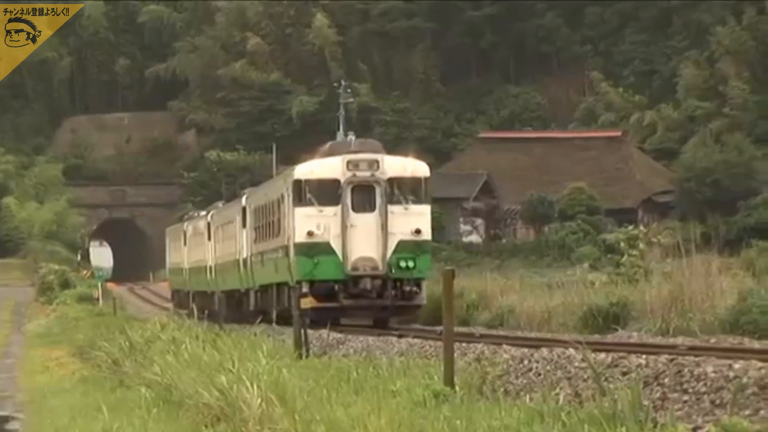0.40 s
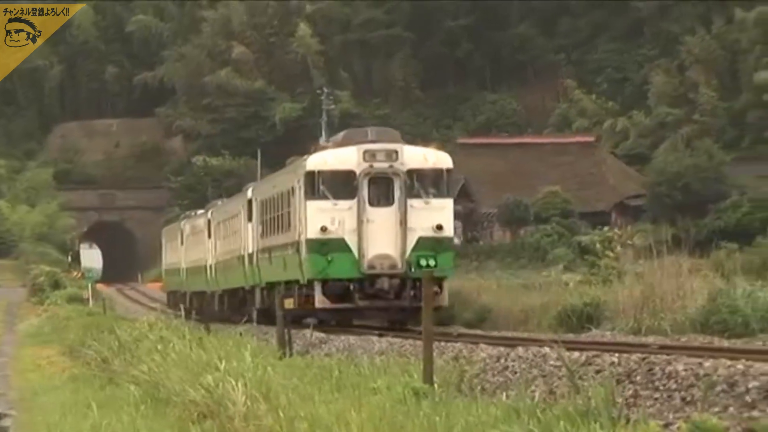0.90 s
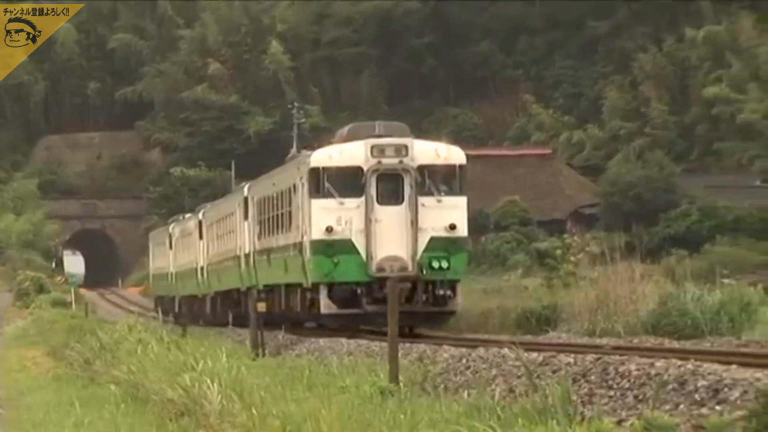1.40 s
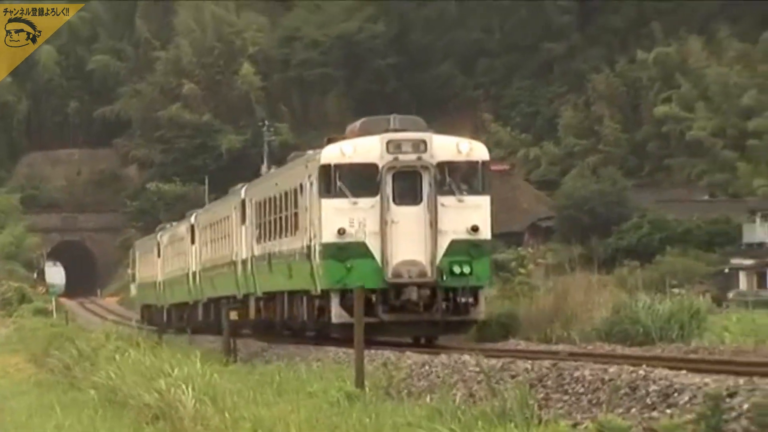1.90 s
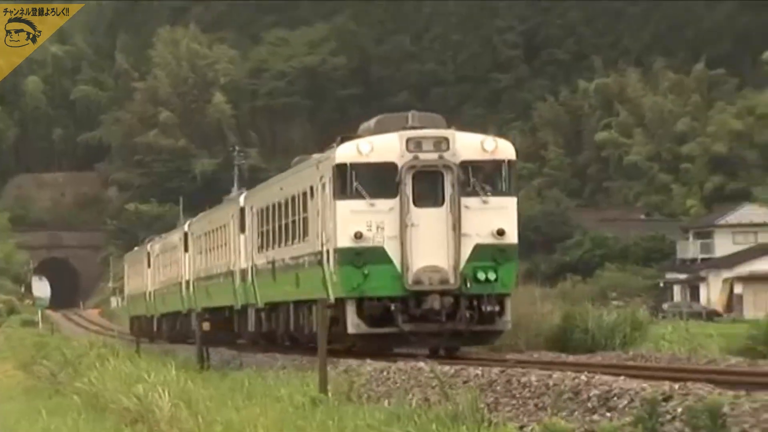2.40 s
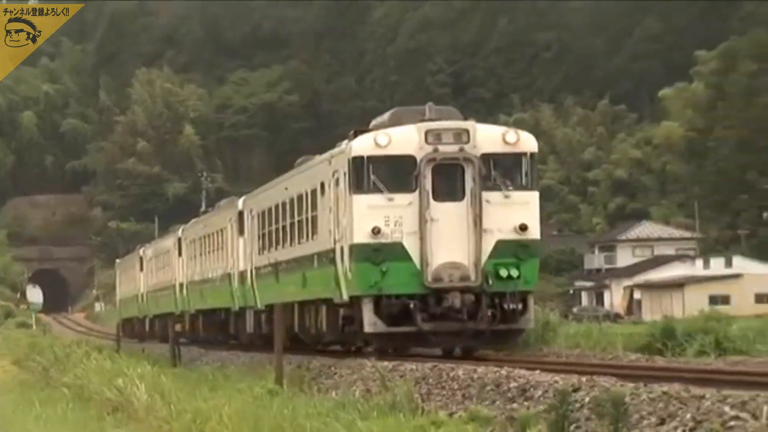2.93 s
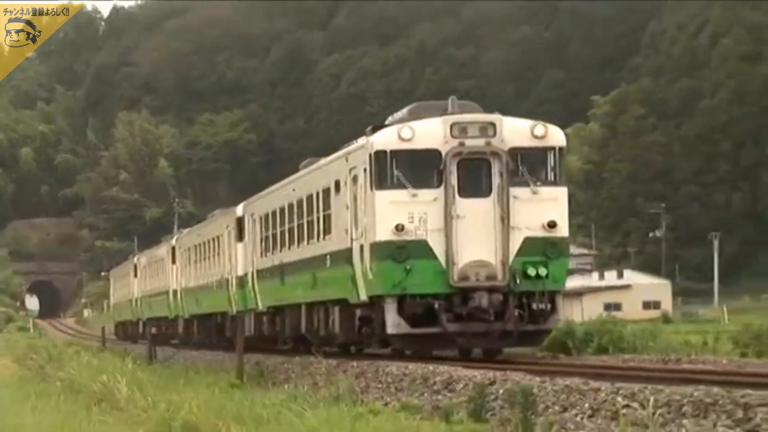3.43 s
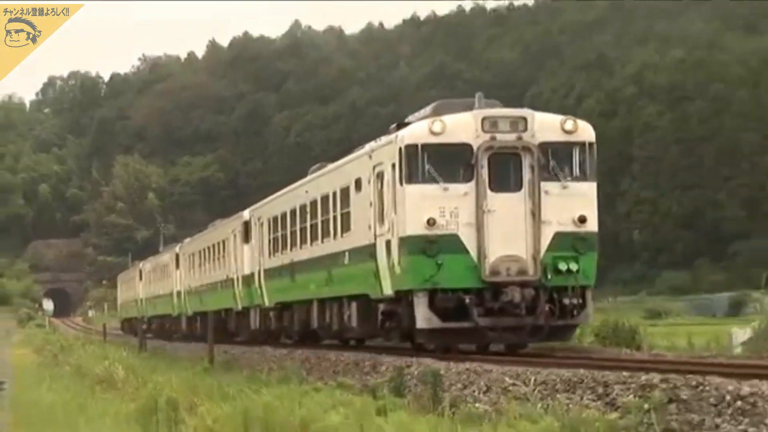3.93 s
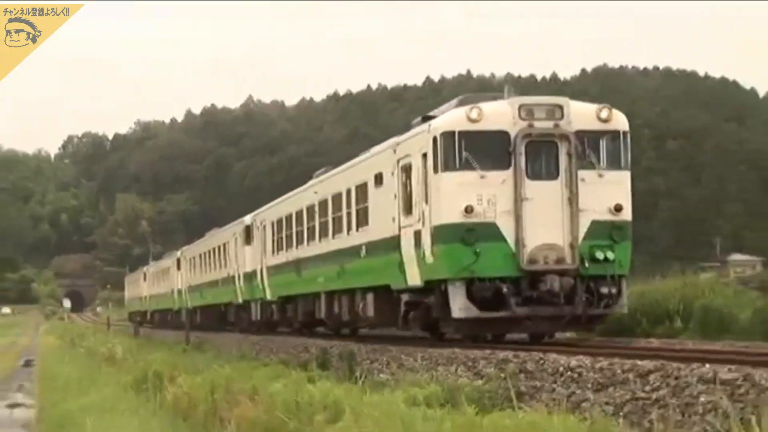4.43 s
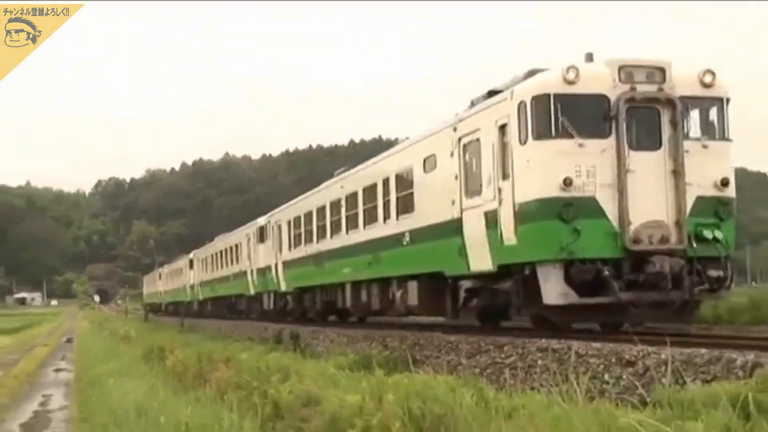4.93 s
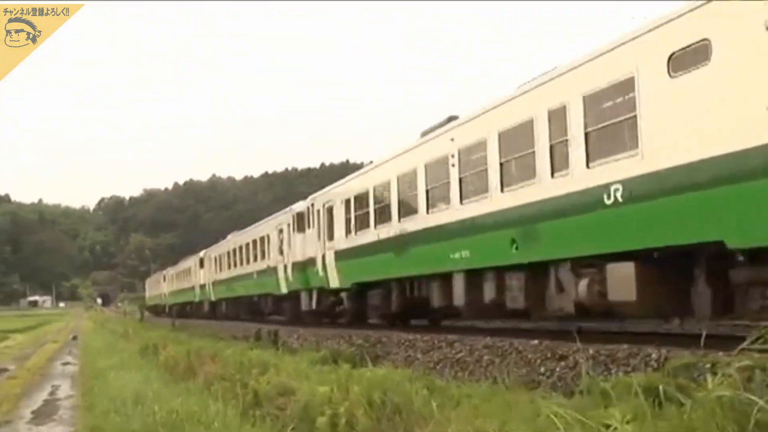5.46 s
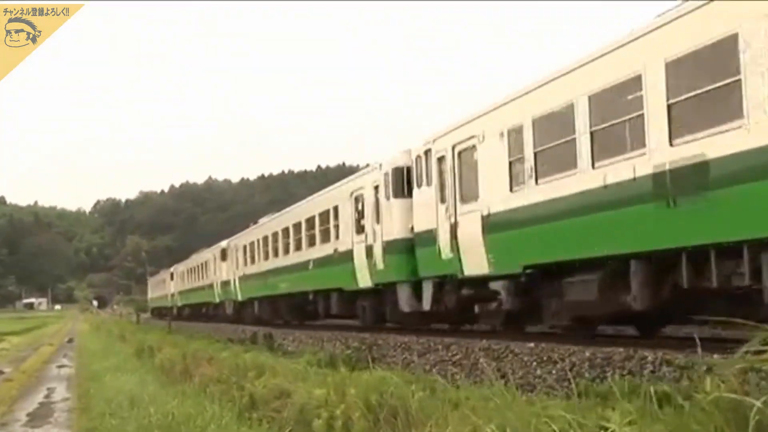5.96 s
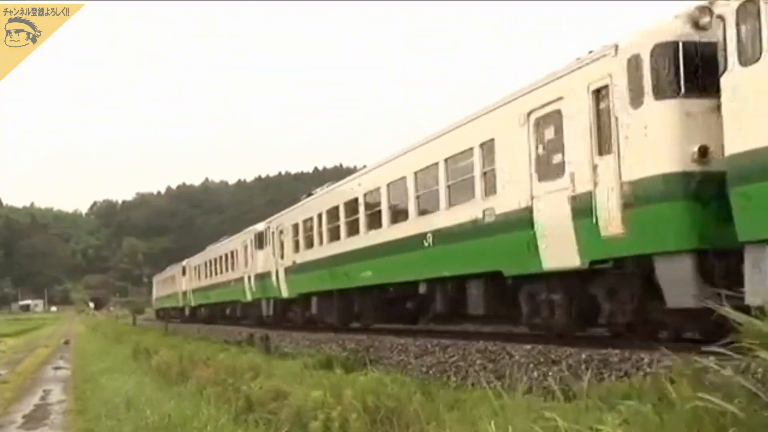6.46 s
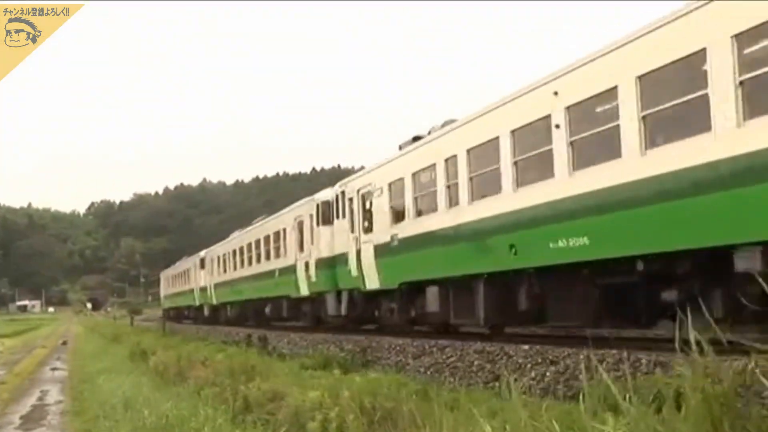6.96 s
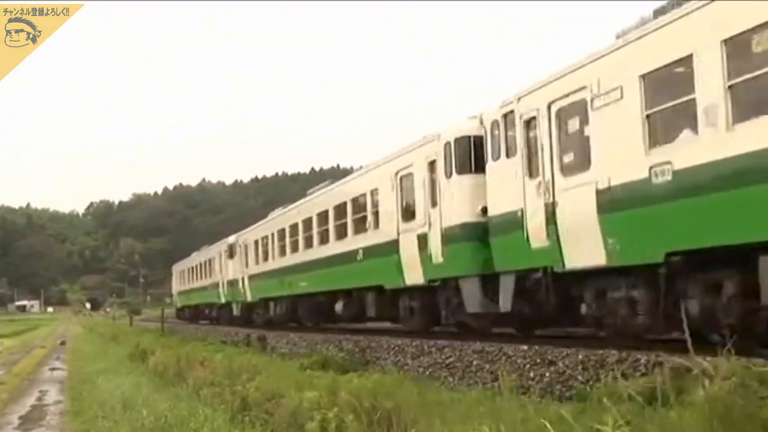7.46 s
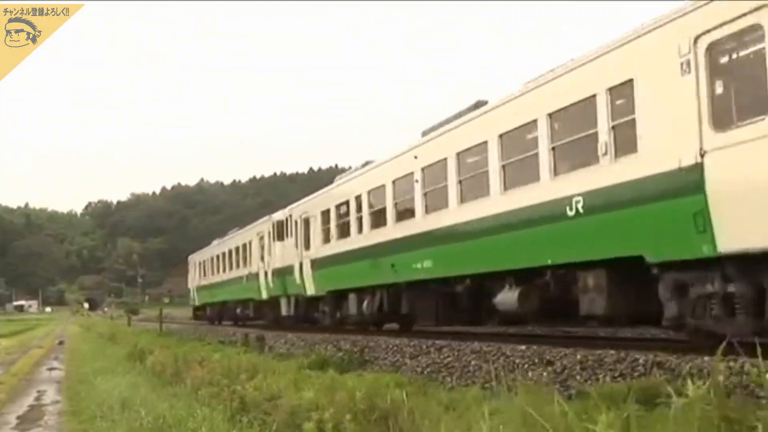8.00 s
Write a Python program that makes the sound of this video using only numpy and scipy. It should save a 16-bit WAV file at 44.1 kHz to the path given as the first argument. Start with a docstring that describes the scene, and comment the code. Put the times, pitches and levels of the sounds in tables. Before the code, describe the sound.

Distant rolling hiss and double joint thuds swell steadily until several diesel railcars rush by at close range in a broad, loud, humming roar.

```python
"""A diesel railcar train nears on the track ahead, then runs past on the right of a microphone pair.
Wheels and underfloor engines roar alongside as shaped noise; ahead come rumble, rolling hiss and fizz.
Axles thump and clack over joints: damped swings and noise bursts. The near rail sings in its resonances.
Two fuzzy hums waver below. Sound from ahead is much alike in both ports; from the side it is
late and mostly weak on the left."""
import sys
import numpy as np
from scipy import signal
from scipy.fft import rfft, irfft, next_fast_len
from scipy.io import wavfile
from scipy.ndimage import uniform_filter1d, map_coordinates

SR = 44100
rng = np.random.default_rng(int(sys.argv[2]) if len(sys.argv) > 2 else 0)


def store_wav(level_fs):
    """Save 16-bit WAV to argv[1]."""
    pcm = np.round(np.clip(np.atleast_2d(level_fs), -1, 1) * 32767)
    wavfile.write(sys.argv[1], SR, pcm.T.astype(np.int16))


def boost(x):
    """Linear amplitude factor 10**(x/20) for a level x in decibels (scalar or array-like)."""
    u = np.asarray(x, float) / 20
    return 10 ** u


N = 357651

# wheel roar of the cars alongside: [t/s, level/dB]
ALONGSIDE = [(3.4, -58.5), (4.5, -47.5), (5.5, -35.5), (5.75, -26), (6.1, -22.5), (6.45, -22.5),
             (6.85, -19), (7.3, -21.5), (7.7, -25), (8.11, -22.5)]
# underfloor engine spectrum: [f/Hz, level/dB per Hz]
ENGINE = [(71, -9.5), (120, -2.5), (231, -4), (291, -6), (335, -4), (430, 0.5), (700, -7.5), (910, -2.5),
          (1540, -120)]
# wheel roar spectrum: [f/Hz, level/dB per Hz]
WHEELS = [(350, -30), (600, -2), (1130, -1), (1540, -4), (2100, -2.5), (3300, -8.5), (4400, -11),
          (5000, -7), (5800, -4.5), (6200, -19.5), (6800, -57), (7100, -26), (10000, -120)]
# treble of the near cars: [f/Hz, level/dB per Hz]
NEAR_FIZZ = [(5710, -38), (9700, 0.5), (10200, 0.5), (11100, 3), (14400, 1), (15000, 0)]
# 7-10 kHz part of that treble: [f/Hz, level/dB per Hz]
SIZZLE = [(6800, -38), (7400, -3.5), (8500, 5), (9500, -14), (10000, -40)]
LEVEL_ROAR_DB = -23  # roar with the train level with the microphone
ENGINE_MOST_DB, ENGINE_FLUTTER_DB = -27, 1.3  # ceiling before wavering; flutter
WHEELS_RE_ROAR_DB, SIZZLE_RE_FIZZ_DB = 0.96, -1.5


def cars_alongside():
    """Engines and wheels roar as shaped noise, swelling steeply as the first car draws level."""
    roar_db, = curves(ALONGSIDE)
    over_db = roar_db - LEVEL_ROAR_DB
    shake = wobble(8)
    engine_db = np.minimum(follow(-23.5, 1.03, over_db), ENGINE_MOST_DB)
    engine_db = engine_db + 0.96 * shake + ENGINE_FLUTTER_DB * wobble(25)
    engines = boost(engine_db) * rush(coloured(ENGINE), patchy_db=1.5)
    wheel_db = roar_db + WHEELS_RE_ROAR_DB + 0.75 * shake + 0.067 * wobble(32)
    wheels = boost(wheel_db) * rush(coloured(WHEELS), patchy_db=0.84)
    sizzle = boost(SIZZLE_RE_FIZZ_DB) * rush(coloured(SIZZLE), patchy_db=1.5)
    treble = rush(coloured(NEAR_FIZZ), patchy_db=2.0) + sizzle
    fizz = boost(follow(-41.5, 0.6, over_db) + 0.37 * shake) * treble
    return engines + wheels + np.sqrt(nearness()) * fizz


# rolling level of the cars ahead: [t/s, level/dB]
AHEAD = [(0, -56), (.5, -52.5), (1.2, -46.5), (2, -44.5), (2.8, -42.5), (3.2, -41), (3.7, -39),
         (4.1, -34.5), (4.6, -32.5), (5.15, -28), (5.6, -23.5), (6.2, -23.5), (6.7, -24.5), (7.3, -31.5),
         (7.7, -26.5), (8.11, -26)]
# ground rumble spectrum: [f/Hz, level/dB per Hz]
RUMBLE = [(12, -40), (20, -37), (32, 3.5), (54, -1), (61, 0.5), (70, 0), (166, -13.5), (300, -32.5),
          (390, -75), (660, -120)]
# rolling hiss spectrum: [f/Hz, level/dB per Hz]
HISS = [(150, -15), (220, 1.5), (400, -13.5), (900, -3), (1300, -5), (2100, -3), (2600, 1), (3300, -5),
        (4200, -6.5), (5100, -6), (6100, -16), (6600, -86), (8000, -81), (10000, -120)]
# wheel resonances over the hiss: [f/Hz, width/Hz, level/dB]
WHEEL_RING = [(1782, 56, 2.5), (1980, 170, 4), (2563, 104, 6), (2960, 196, 3), (3280, 160, 2.5),
              (3500, 27, 6)]
# treble of the far cars: [f/Hz, level/dB per Hz]
FAR_FIZZ = [(3820, -7), (6500, 3), (7770, -6.5), (8660, 3.5), (10500, -8.5), (13100, -10), (14500, -16),
            (15000, -29)]
MIDDLING_ROLL_DB = -40  # rolling level at middling distance
RUMBLE_MOST_DB, RUMBLE_ALONGSIDE_DB = -36.5, 3  # ceiling; extra once alongside
HISS_RE_ROLL_DB, RING_RE_ROLL_DB = -2.2, -6


def train_ahead():
    """Ground rumble, rolling hiss, wheel resonances and fizz: noises driven by one rolling level."""
    roll_db, = curves(AHEAD)
    over_db = roll_db - MIDDLING_ROLL_DB
    shake = wobble(9)  # uneven track: shared by rumble, hiss and fizz
    rumble_db = np.minimum(follow(-39, 0.42, over_db), RUMBLE_MOST_DB)
    rumble_db = rumble_db + RUMBLE_ALONGSIDE_DB * nearness() ** 4 + 1.6 * shake + 1.5 * wobble(3)
    rumble = boost(rumble_db) * rush(coloured(RUMBLE), patchy_db=0.0)
    hiss_db = roll_db + HISS_RE_ROLL_DB + 0.097 * shake + 0.11 * wobble(23)
    hiss = boost(hiss_db) * rush(coloured(HISS), patchy_db=1.68)
    ring_db = roll_db + RING_RE_ROLL_DB + 0.7 * wobble(12) + 1.5 * wobble(2.5)
    ring = boost(ring_db) * rush(ringing(WHEEL_RING), patchy_db=1.8)
    fizz_db = follow(-61.5, 1.19, over_db) + 2.3 * shake + 0.56 * wobble(7.1)
    fizz = boost(fizz_db) * rush(coloured(FAR_FIZZ), patchy_db=2.0)
    return rumble + hiss + ring + np.sqrt(1 - nearness()) * fizz


# axles on joints: [t/s, swing peak level/dB, swing f/Hz, shudder level/dB, clack level/dB]
JOINTS = [(0.12, -35, 75.6, -39, -39.5), (0.233, -48, 90, -42, -45), (1.014, -30.5, 74, -30.5, -32.5),
          (1.127, -43, 97, -36, -35), (1.511, -26, 201, -24, -24.5), (1.626, -28.5, 157, -24.5, -29.5),
          (1.779, -33, 141, -31, -50), (1.88, -17.5, 167, -21, -31), (1.997, -27.5, 174, -24.5, -34),
          (2.281, -26.5, 101, -30.5, -38), (2.401, -34, 95, -31, -49), (2.661, -33, 93, -30, -43),
          (2.772, -25.5, 71, -29, -42), (2.984, -35, 58.4, -26, -41), (3.114, -23, 170, -18, -23.5),
          (3.231, -22.5, 125, -21, -25.5), (3.457, -28, 67.3, -30.5, -53), (3.839, -27.5, 68.4, -31, -44),
          (3.92, -24, 101, -27, -34), (4.032, -25.5, 85, -28, -49), (4.428, -25.5, 98, -28.5, -37),
          (5.233, -32, 76, -22.5, -27), (5.654, -30, 90, -21.5, -35), (5.769, -23, 81, -20, -33),
          (5.969, -30, 80, -19, -36), (6.509, -30, 70, -27, -35), (6.634, -24, 73, -28, -34),
          (7.684, -26, 80, -40, -37)]
# ground shudder spectrum: [f/Hz, level/dB per Hz]
THUMP = [(25, -26), (45, 16), (110, 4.5), (230, 1), (340, -17), (500, -49.5)]
# knock spectrum: [f/Hz, level/dB per Hz]
KNOCK = [(170, -30), (260, -3), (400, 2), (600, -9), (900, -0.5), (1300, -9), (1800, -45)]
# steel clack spectrum: [f/Hz, level/dB per Hz]
CLACK = [(1000, -10), (1500, -5), (2500, -0.5), (4000, -9.5), (5000, -13), (6500, -28), (9000, -46),
         (14000, -64)]
MIDDLING_BLOW_DB = -33  # mean of shudder and clack
KNOCK_DB_PER_OCTAVE = 4.5  # blows with a higher swing knock harder
CLACK_LEAD_S = 0.006


def joints():
    """An axle drops on a joint: steel clack first, then track bed swings, ground shudder and knock."""
    size = SR // 4
    out, t = np.zeros((2, N + SR)), np.arange(size) / SR
    for s, swing_db, hz, shudder_db, clack_db in JOINTS:
        at = round(s * SR)
        swing = np.sin(2 * np.pi * hz * t) * np.exp(-hz * t / 1.15) * (1 - np.exp(-t / 0.006))
        out[0, at:at + size] += boost(swing_db) * swing / swing.max()
        out[:, at:at + size] += boost(shudder_db) * burst(THUMP, 0.012, 0.25)
        blow_db = (shudder_db + clack_db) / 2
        knock_db = follow(-45.5, 0.91, blow_db - MIDDLING_BLOW_DB)
        knock_db += KNOCK_DB_PER_OCTAVE * np.log2(hz / 130)
        out[:, at:at + size] += boost(knock_db) * burst(KNOCK, 0.0015, 0.15)
        at -= round(CLACK_LEAD_S * SR)
        out[:, at:at + size] += boost(clack_db) * burst(CLACK, 0.0083, 0.14)
    return out[:, :N]


# bogies whose blows run along the near rail: [first axle t/s, ping level/dB]
PINGS = [(3.012, -27), (3.815, -36), (4.196, -45)]
# blow on the near rail: [f/Hz, level/dB per Hz]
PING = [(350, -34), (550, -12), (850, 4), (1080, -9), (1400, 1), (1600, -4), (1800, -24), (4000, -50)]
# bright tick of every axle: [f/Hz, level/dB per Hz]
TICK = [(6500, -40), (8200, 6), (9500, -8), (14000, -8), (15000, -30)]
# rail resonances: [f/Hz, width/Hz, level/dB]
RAIL = [(427, 41, -16), (562, 20, -5.5), (783, 39, -1.5), (953, 96, -6), (1121, 50, 2.5), (1147, 40, 5.5),
        (1280, 70, -4.5), (1416, 12, -13), (1490, 23, -6.5)]
AXLE_GAP_S, SECOND_AXLE_DB, TICK_DB = 0.116, 1, -49  # second axle re the bogie's first
RAIL_S, RAIL_RISE_S = 3.03, 0.067  # first axle on the near rail; build-up of the singing


def rail():
    """The rail sings in its resonances; bending waves of blows arrive high pitch first, with a tick."""
    blows, ticks = np.zeros((2, 2, N))
    for first_s, first_db in PINGS:
        for axle in range(2):
            at = round((first_s + axle * AXLE_GAP_S) * SR)
            ping_db = first_db + axle * SECOND_AXLE_DB
            blows[:, at:at + SR // 4] += boost(ping_db) * burst(PING, 0.004, 0.042)
            ticks[:, at:at + SR // 4] += boost(TICK_DB) * burst(TICK, 0.0037, 0.091)

    def bending(hz):
        # delay/s = 20 / (hz + 100) - 0.009
        spread = np.exp(-2j * np.pi * 20 * np.log((hz + 100) / 1900) + 2j * np.pi * 0.009 * hz)
        return (boost(4) + boost(11) * ringing(RAIL)(hz)) * spread

    ping = filtered(blows, bending)
    on_rail = 1 - np.exp(-np.maximum(np.arange(N) / SR - RAIL_S, 0) / RAIL_RISE_S)
    singing_db = follow(-43, 0.56, curves(AHEAD)[0] - MIDDLING_ROLL_DB) + 0.8 * wobble(9)
    singing = on_rail * boost(singing_db) * rush(ringing(RAIL), patchy_db=1.5)
    return ping + ticks + singing


HUM_KNEE_DB, HUM_PAST_KNEE = -36, 0.37  # above the knee the upper hum grows by this share
LOW_HUM_S, LOW_HUM_DB = 6.66, -28.5  # peak of the lower hum, before wavering
LOW_HUM_SWELL_DB_PER_S, LOW_HUM_FADE_DB_PER_S = 21.5, 5


def hums():
    """Wavering resonant noises: the upper grows as the train nears, the lower passes with car two."""
    late_s = np.arange(N) / SR - LOW_HUM_S
    loudest_db = np.maximum.accumulate(curves(AHEAD)[0])  # never falls back
    upper_db = follow(-58.5, 2.26, loudest_db - MIDDLING_ROLL_DB)
    upper_db = np.minimum(upper_db, HUM_KNEE_DB + HUM_PAST_KNEE * (upper_db - HUM_KNEE_DB))
    upper_db = upper_db + 0.49 * wobble(5)
    slope_db = np.minimum(LOW_HUM_SWELL_DB_PER_S * late_s, -LOW_HUM_FADE_DB_PER_S * late_s)
    lower_db = LOW_HUM_DB + slope_db + 0.88 * wobble(2.9)
    upper = rush(ringing([(437, 26, 0), (482, 34, -3), (545, 50, -9)]), patchy_db=1.5)
    lower = rush(ringing([(296, 14, 0)]), patchy_db=1.5)
    return boost(upper_db) * upper + boost(lower_db) * lower


def nearness():
    """0 while the train is ahead, 1 once it is alongside."""
    return np.clip((np.arange(N) / SR - 4.3) / 1.22, 0, 1)


def follow(level_db, growth, over_db):
    """Level of a layer that grows by growth dB per dB of its control."""
    return level_db + growth * over_db


def unit(x):
    """Scaled to rms 1."""
    return x / np.sqrt(np.mean(x ** 2) + 1e-20)


def along(points, hz):
    """Every column after the Hz, read on a log axis."""
    f, *cols = np.transpose(points)
    return [np.interp(np.log(hz + 1), np.log(f + 1), c) for c in cols]


def curves(rows):
    """One value per sample for each column after the time."""
    s, *cols = np.transpose(rows)
    return [np.interp(np.arange(N) / SR, s, c) for c in cols]


def wobble(knots_per_s):
    """A smooth random curve through normal random knots."""
    knots = rng.standard_normal(int(N * knots_per_s / SR) + 4)
    return map_coordinates(knots, [np.arange(N) * knots_per_s / SR])


def filtered(x, response):
    """x times a complex response of frequency."""
    size = next_fast_len(x.shape[-1] + 8192)
    spectrum = rfft(x, size) * response(np.fft.rfftfreq(size, 1 / SR))
    return irfft(spectrum, size)[..., :x.shape[-1]]


def ringing(modes):
    """Response of a sum of resonances with alternating sign."""
    def response(f):
        return sum((-1) ** k * boost(db) * 1j * f * width / (c * c - f * f + 1j * f * width)
                   for k, (c, width, db) in enumerate(modes))
    return response


def coloured(spectrum):
    """Response of a table of dB per Hz."""
    return lambda hz: boost(along(spectrum, hz)[0])


def rush(response, patchy_db):
    """Two unrelated noises, scaled jointly to rms 1, with shared patches of random gain."""
    z = signal.stft(rng.standard_normal((2, N)), nperseg=512)[2]
    field = uniform_filter1d(rng.standard_normal(z.shape[1:]), size=5, axis=0)
    field = uniform_filter1d(field, size=10, axis=1)
    pair = signal.istft(z * boost(patchy_db * unit(field)), nperseg=512)[1][:, :N]
    return unit(filtered(pair, response))


def burst(spectrum, rise_s, t60_s):
    """A pair of short noise bursts, each with the energy of its envelope."""
    t = np.arange(SR // 4) / SR
    shape = boost(-60 * t / t60_s) * (1 - np.exp(-t / rise_s))
    noise = shape * filtered(rng.standard_normal((2, len(t))), coloured(spectrum))
    return noise * np.linalg.norm(shape) / np.linalg.norm(noise, axis=1, keepdims=True)


def ports(pair, table, notches):
    """Left and right port: a common plus an unrelated part, tilted and lagged by direction."""
    def mix(hz, sign):
        alike, tilt_db, lag_rad = along(table, hz)
        apart = hz ** 2 / (hz ** 2 + 150 ** 2)  # long waves reach both ports alike
        turn = apart * np.arccos(np.clip(alike, 0, 1)) / 2
        housing = np.prod([1 - min(depth, 1) * np.exp(-((hz - c) / width) ** 2 * 2)
                           for c, width, depth in notches], axis=0)
        gain = housing * boost(sign * tilt_db / 2) * np.exp(-0.5j * sign * lag_rad * apart)
        return gain * np.array([np.cos(turn), sign * np.sin(turn)])
    return np.array([filtered(pair, lambda hz: mix(hz, sign)).sum(0) for sign in (1, -1)])


# port pair, likeness and lag as reached well above 150 Hz
# sound from ahead: [f/Hz, likeness/0-1, left minus right level/dB, left lag/rad]
FRONT = [(170, 1, 0, 0), (340, .95, 0, 0), (690, .55, 0, .2), (1200, .75, 0, .1), (1550, .7, -1, .1),
         (1900, .95, -1, 0), (2300, 1, 0, 0), (3600, 1, 0, 0), (4500, .55, 0, 0), (5150, .82, 0, .3),
         (6000, .5, 3, 3), (8600, .4, -1, 3), (10300, .9, 0, 6.2), (12000, .5, -2, 6.5),
         (14000, .1, -3, 6.5)]
# sound from the right: [f/Hz, likeness/0-1, left minus right level/dB, left lag/rad]
RIGHT = [(170, .97, 1, .3), (340, .88, 2, .7), (690, .82, -4, 1.6), (1200, .65, -11, 1.2),
         (1550, .55, -11, 1.1), (2000, .5, -10, .8), (2500, .6, -7, .3), (3100, .8, -2, .1),
         (3800, .45, -3, 1.6), (4500, .7, -5, 2.5), (5150, .55, -3, 1.9), (6000, .8, -3, 3.1),
         (6400, .96, -1, 3.1), (7200, .9, -1, 3.1), (9200, .8, -1, 3.1), (10300, .85, 0, 6.2),
         (12000, .25, -6, 6.9), (14000, .15, -7, 6.3)]
# notches cut by the microphone housing, from ahead: [f/Hz, width/Hz, depth/0-1]
FRONT_NOTCHES = [(630, 88, 0.6), (1540, 116, 0.7), (1957, 87, 0.62), (4662, 420, 0.83), (5480, 530, 0.57),
                 (7600, 450, 0.5)]
# the same from the right: [f/Hz, width/Hz, depth/0-1]
RIGHT_NOTCHES = [(4410, 80, .5), (5425, 570, 1)]


def scene():
    """Sources to the right and sources ahead, each through the port pair."""
    right = ports(cars_alongside() + rail() + hums(), RIGHT, RIGHT_NOTCHES)
    ahead = ports(train_ahead() + joints(), FRONT, FRONT_NOTCHES)
    return right + ahead


def low_pass(x):
    """Removes everything above the highest recorded frequency."""
    return signal.sosfilt(signal.butter(12, 15470, fs=SR, output="sos"), x)


def record(dry):
    """Bass cut at 30 Hz and band limit at 15 kHz."""
    def limits(hz):
        return (hz < 15000) * hz ** 4 / (hz ** 4 + 30.0 ** 4)
    finished = filtered(dry, limits)
    return low_pass(finished)


dry = scene()
out = record(dry)
store_wav(out)
```